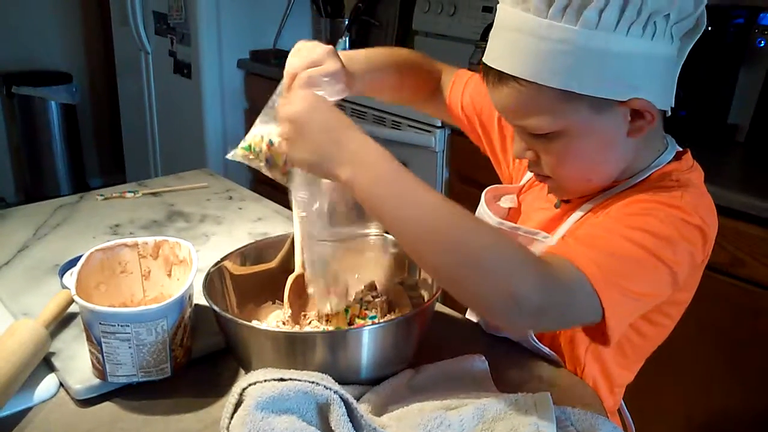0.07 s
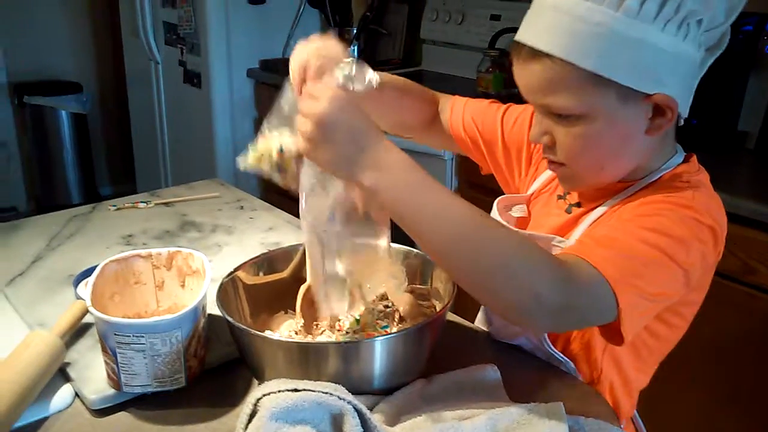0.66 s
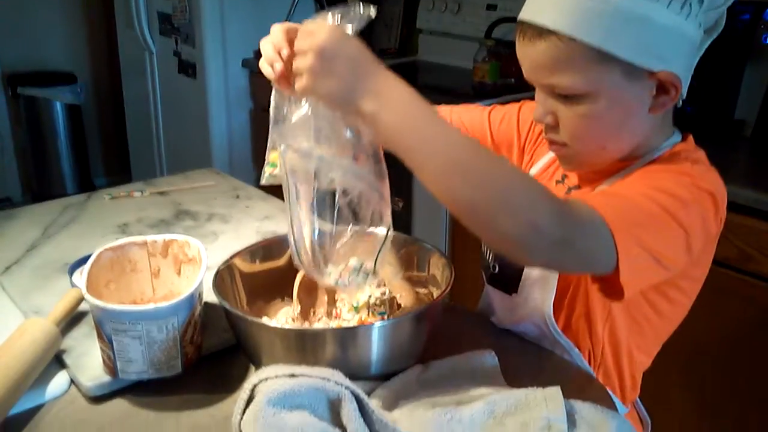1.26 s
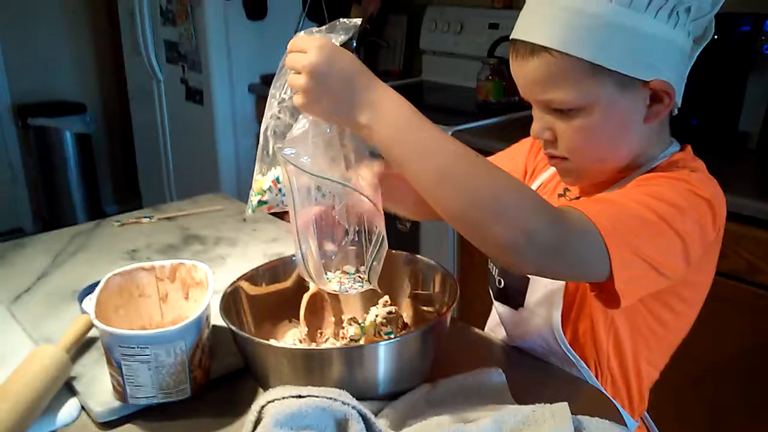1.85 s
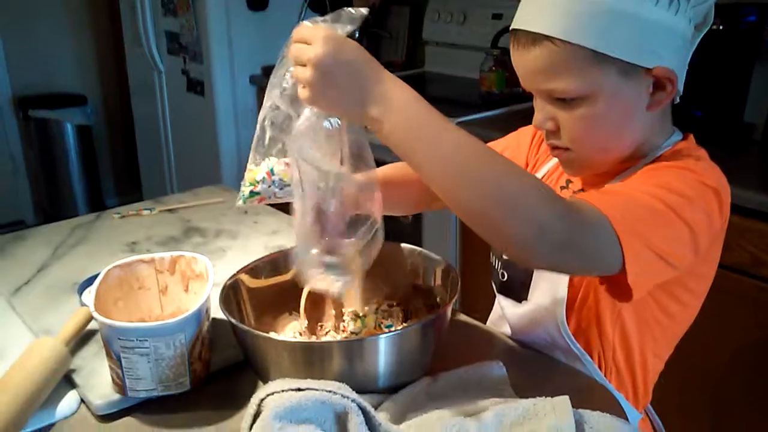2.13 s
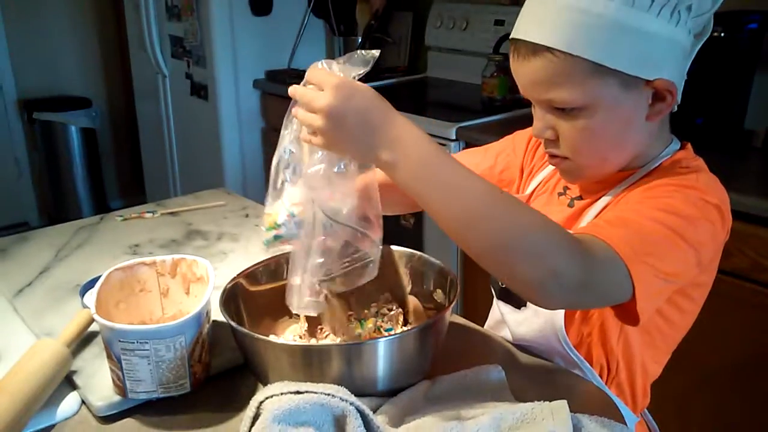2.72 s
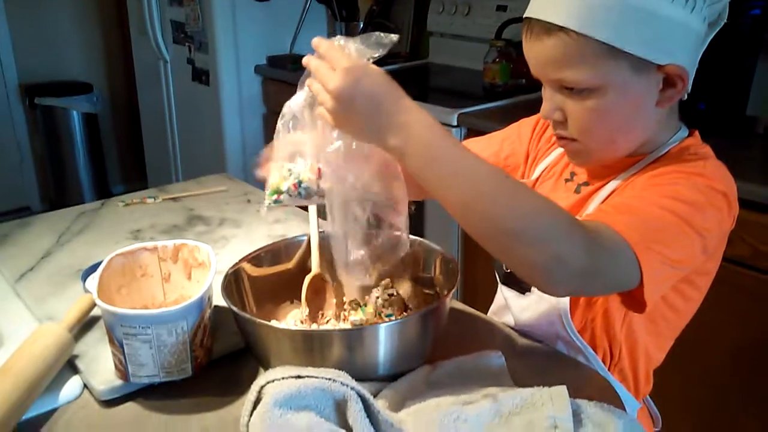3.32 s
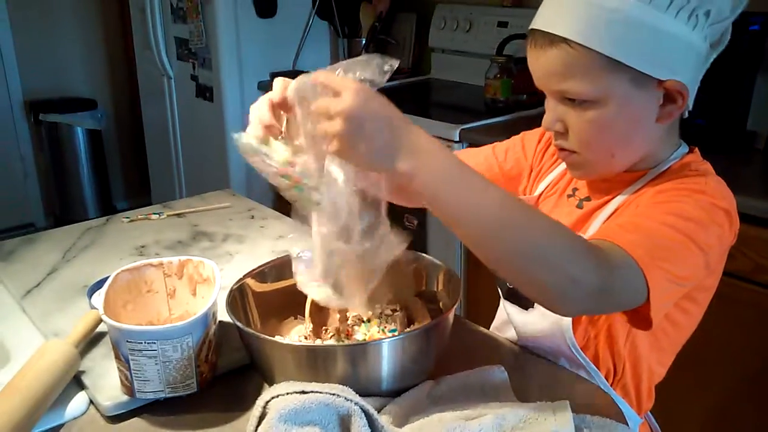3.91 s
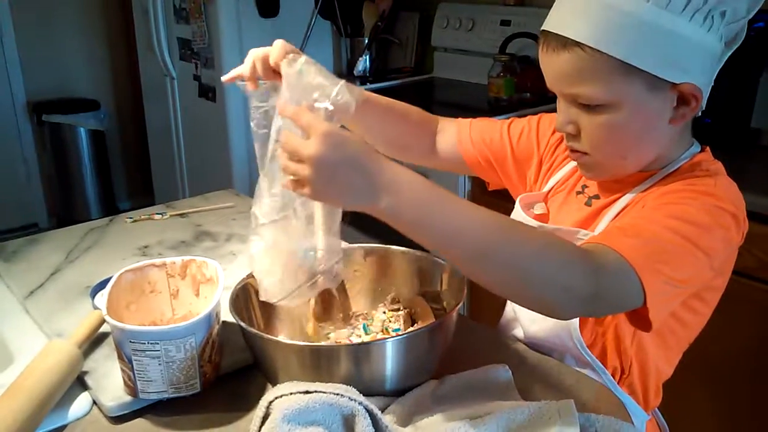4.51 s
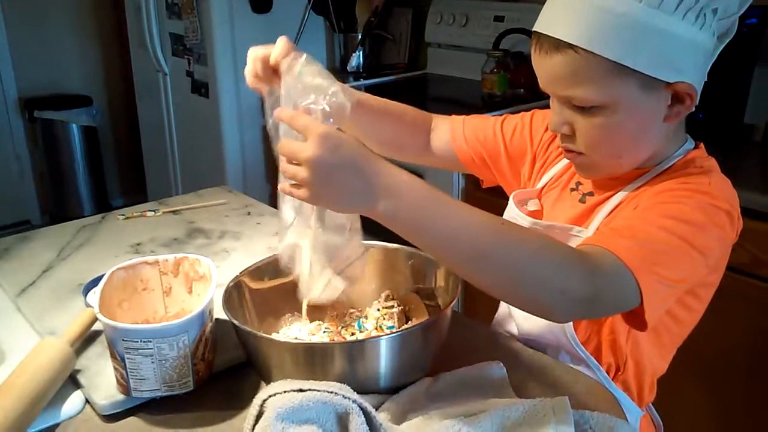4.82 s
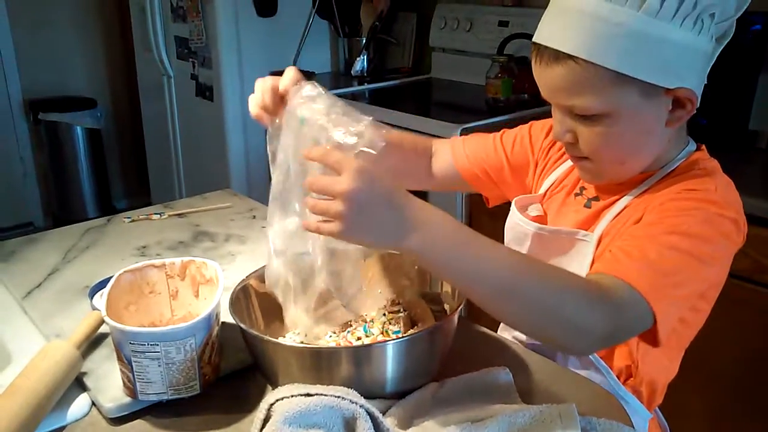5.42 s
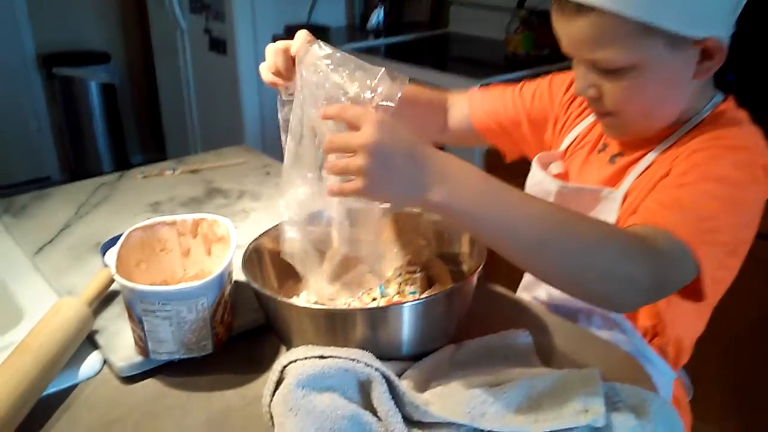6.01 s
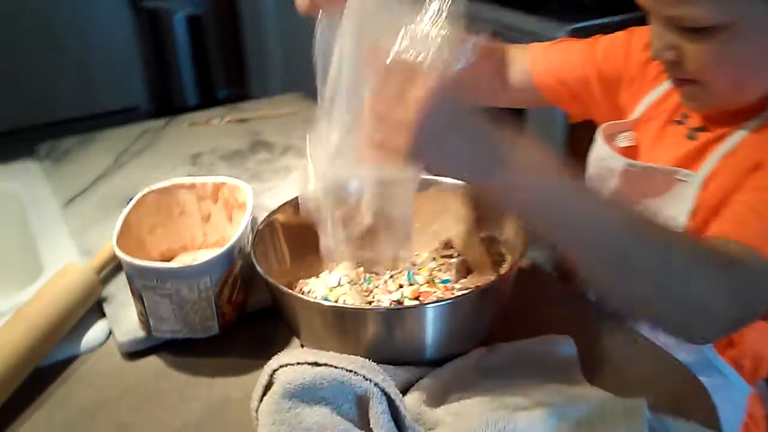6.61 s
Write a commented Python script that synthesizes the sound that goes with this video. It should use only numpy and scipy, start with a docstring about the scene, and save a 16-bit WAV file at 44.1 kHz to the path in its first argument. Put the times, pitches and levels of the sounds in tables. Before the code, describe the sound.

Plastic rustles in uneven bursts while a few candy pieces click into a metal bowl, then the rest falls in a quick rush.

```python
"""Candy poured from a bag

A thin plastic bag of hard candy is shaken out over a steel mixing bowl in a kitchen. The film buckles
in crinkles and snaps; single pieces collide and set the bowl ringing, then the rest pours in a rush.
Behind it are room air, an appliance's hum and whine, and a far motor that speeds up and slows;
a noise suppressor turns these down whenever bag and candy are quiet."""
import sys
import numpy as np
from scipy import signal
from scipy.fft import rfft, irfft
from scipy.io import wavfile
from scipy.ndimage import uniform_filter1d

SR = 44100
rng = np.random.default_rng(int(sys.argv[2]) if len(sys.argv) > 2 else 0)


def master(y):
    """Save y as 16-bit WAV."""
    cut = np.clip(np.atleast_2d(y).T, -1, 1)
    pcm = np.round(cut * 32767)  # scale
    wavfile.write(sys.argv[1], SR, pcm.astype(np.int16))


N = 293573
TIME = np.arange(N) / SR

# spectrum of the crinkling film: (frequency [Hz], gain [dB])
FILM_SPECTRUM = [(350, -17.5), (600, -24.5), (996, -15), (1220, -22), (1380, -18.5), (1650, -12),
                 (1890, -20.5), (2230, -15), (2460, -5), (2740, -4), (3700, 0), (8420, -11), (10800, -3.5),
                 (12500, -16.5), (15800, -12)]
# resonances of the half-filled bag and bowl: (frequency [Hz], width [Hz], gain [dB])
CAVITY_MODES = [(1220, 130, 13), (1750, 210, 3.5), (2167, 310, 10), (2520, 296, -10.5), (2815, 510, 5),
                (10700, 880, -3)]
# spectrum of a hard tick: (frequency [Hz], gain [dB])
TICK_SPECTRUM = [(1000, -25.5), (2800, -31.5), (4400, -3), (7000, 2.5), (8500, -4), (10500, -1),
                 (12000, -15), (15500, -16)]
# candy striking candy: (time [s], relative level [dB], ring frequency [Hz], tick [dB re ring],
# crack [dB re ring], reverberation [dB])
COLLISIONS = [(1.1452, -33, 6730, -14, -28, -4), (1.159, -16, 6800, -8.5, -31, -2.5),
              (2.2516, -23.5, 6860, 3, -9, 4.5), (2.3175, -17.5, 6660, 1.5, -3, -2.5),
              (2.55, -32.5, 6160, 1, -12, -0.5), (2.6024, -29.5, 6960, -11, -2, -3.5),
              (2.7193, -34, 6850, 3, 1, -0.5), (4.1625, -12.5, 6500, 11, 3, -13),
              (4.425, -11, 6900, -8, -18, 7), (4.4668, 2, 6700, -7, -23, -5),
              (4.5282, -1.5, 6700, -4, -27, -4.5), (4.5412, -12, 6340, -6, -25, -10),
              (4.572, -4, 7320, -3.5, -24, -9), (4.6056, -1.5, 6900, -5.5, -18, -6.5),
              (4.609, -17, 4550, -6, -21, -3.5), (4.6277, -20, 6400, 0, -18, 12),
              (4.8726, -29.5, 6860, -9, -8, 2)]


def bag_crinkle(rub_db=-10, rub_growth=0.59, gentle_swell_db=-50, low_edge_hz=2300, high_edge_hz=7000):
    """Buckling and friction: separate creases merge into a rub as the rustle grows louder."""
    level, crisp, flap = rustle_swells()
    fine = creases(per_s=1600, spread_db=4.5, cycles=8.6, lowest_hz=1087, highest_hz=13900)
    folds = .5 * creases(per_s=140, spread_db=2, cycles=30, lowest_hz=2100, highest_hz=6200)
    ticks = from_db(-5) * unit_rms(impulses(per_s=250, spread_db=5))
    crackle = stick_slip() * unit_rms(fine + folds + ticks)
    rub = from_db(rub_db) * (level / from_db(gentle_swell_db)) ** rub_growth
    excitation = (crackle + rub * rng.standard_normal(N)) / np.sqrt(1 + rub ** 2)
    film = colour(excitation, FILM_SPECTRUM, CAVITY_MODES)
    # slack film flaps low and puffs air; tight film is crisp
    slack = from_db(-3) * unit_rms(band(film, 290, low_edge_hz, order=4))
    body = from_db(-1) * unit_rms(band(film, low_edge_hz, high_edge_hz, order=4))
    tight = unit_rms(band(film, high_edge_hz, 23000, order=4))
    puff = from_db(-30) * unit_rms(band(rng.standard_normal(N), 210, 770))
    return flap * slack + level * (body + puff) + crisp * tight


def rustle_swells(held_db=-87.5, swing_db=18.5):
    """Incoherent swells add in power; returns the gains of crinkle, crisp treble and low flapping."""
    # swells of rustle: tugs of the bag, and the brief hiss after falling candy: (time [s],
    # relative level [dB], build-up [s], relaxation [s], treble offset [dB], flapping offset [dB])
    swells = [(0.1, -48, 0.11, 0.34, 2.5, -4), (0.281, -32.5, 0.15, 0.085, -8, -11.5),
              (0.41, -44, 0.074, 0.082, 2, -10.5), (0.73, -57, 0.31, 0.067, 8, -2.5),
              (0.869, -49.5, 0.36, 0.11, -6.5, -9), (1.18, -54.5, 0.055, 0.1, 0, -4.5),
              (1.33, -51.5, 0.12, 0.027, -3.5, -18), (2.061, -62.5, 0.13, 0.05, -8, -12),
              (2.29, -55.5, 0.053, 0.19, 5, -33), (3.101, -54.5, 0.071, 0.095, -5, -11),
              (3.341, -53, .09, 0.045, -2.5, -8), (3.46, -49.5, 0.068, 0.17, -3.5, -7),
              (3.66, -46.5, 0.17, 0.89, -4.5, -8.5), (3.906, -29.5, 0.16, 0.2, -5, -10),
              (4.26, -29, 0.27, 0.13, -3, -5), (4.348, -28.5, 0.029, 0.042, -22, -8.5),
              (4.47, -35.5, 0.27, .15, 8, -5), (4.931, -60.5, 0.24, 0.3, 8, -5),
              (5.09, -42.5, 0.11, 0.14, -8, -12.5), (5.27, -59.5, 0.51, 0.34, -1, 0.5),
              (5.47, -42.5, 0.37, 0.26, -6, -11.5), (5.62, -51, .05, 0.27, 1.5, -2.5),
              (5.8, -54, 0.084, 0.44, -6, -5.5), (6.06, -54, 0.28, 0.12, -29, -11),
              (6.19, -41, 0.17, 0.18, -6.5, -6.5), (6.51, -53, 0.04, 0.04, -4.5, -10),
              (6.608, -55, .04, 0.22, -9.5, -7)]
    power = np.full((3, N), from_db(held_db) ** 2)
    for s, db, build_s, relax_s, crisp_db, flap_db in swells:
        from_peak = np.maximum((s - TIME) / build_s, (TIME - s) / relax_s)
        envelope = from_db(db - swing_db * np.minimum(from_peak, 10))
        power += (from_db([[0], [crisp_db], [flap_db]]) * envelope) ** 2
    return np.sqrt(power)


def creases(per_s, spread_db, cycles, lowest_hz, highest_hz, clump_db=4, clumps_per_s=30, count=16):
    """Impulse excitation: creases come in clumps, each ringing for some cycles at its own pitch."""
    out = np.zeros(N)
    for hz in np.geomspace(lowest_hz, highest_hz, count):
        clicks = impulses(per_s / count, spread_db) * from_db(clump_db * drift(clumps_per_s))
        out += np.sqrt(hz) * unit_rms(damped_mode(clicks, hz, t60=cycles / hz))
    return unit_rms(out)


def stick_slip(per_s=14, jump_db=7, fade_s=0.014):
    """Stick-slip: the film gives way in fits, so its gain jumps at once and then relaxes."""
    starts = rng.random(N) < per_s / SR
    slip = signal.lfilter([1], [1, -np.exp(-1 / (fade_s * SR))], starts + 1e-18)
    return unit_rms(from_db(jump_db * np.minimum(slip, 1)))


def bag_snaps(gain_db=-11, buckle_t60=.022, crack_t60=0.009, crack_db=2):
    """Snap-through buckling: a large fold gives a knock, a brief pitch set by its size, and a crack."""
    # sharp buckles of the film: (time [s], relative level [dB], centre [Hz], crack offset [dB])
    buckles = [(0.1106, -29, 6500, -7), (0.272, -21, 3500, -23), (0.355, -36.5, 4170, 7.5),
               (0.393, -34, 2880, 2.5), (0.6845, -35, 4590, -7), (0.7313, -36.5, 4600, 4),
               (1.0294, -43, 4950, -4.5), (1.1003, -48, 4180, 4), (1.226, -31.5, 7100, -5),
               (1.4635, -49.5, 3440, -2), (1.66, -48.5, 3060, 1.5), (1.908, -43, 5960, -4),
               (1.9717, -48, 3830, -2), (2.022, -42.5, 5500, -1.5), (2.201, -49.5, 3990, -1),
               (2.2463, -34.5, 4800, -3), (2.522, -45, 6900, -3), (2.688, -44, 6870, -3),
               (2.905, -48.5, 3006, -10), (2.9558, -54.5, 3060, 6), (3.098, -40.5, 2710, -5),
               (3.2814, -46, 2933, -5), (3.4458, -31.5, 5600, -27), (3.7537, -26.5, 4040, -14),
               (3.7716, -24, 3900, -7), (3.8459, -14.5, 4550, -17), (3.914, -13.5, 4820, -2),
               (4.347, -3, 6100, -29), (4.9458, -31, 4930, -11), (5.075, -29.5, 3320, -14),
               (5.132, -28.5, 3100, -19), (5.2106, -36.5, 5180, -0.5), (5.6142, -28, 4400, -24),
               (5.7904, -37, 3094, 1), (5.98, -31, 5000, -20), (6.059, -35, 2950, -23),
               (6.1, -27, 3600, -7), (6.131, -13, 4940, -25), (6.603, -37.5, 3480, -6)]
    out = np.zeros(N)
    for s, db, hz, bright_db in buckles:
        knock = unit_rms(band(contacts(buckle_t60, wet_db=-4), hz / 1.46, hz * 1.46, order=1))
        ring = unit_rms(band(contacts(buckle_t60, wet_db=-14), hz / 1.15, hz * 1.15))
        crack = band(contacts(crack_t60, wet_db=-4), 7500, 21000)
        add(out, s, db + gain_db, colour(knock + from_db(-3) * ring, FILM_SPECTRUM, CAVITY_MODES))
        add(out, s, db + gain_db + bright_db + crack_db, colour(crack, TICK_SPECTRUM))
    return out


def bag_pops(gain_db=-9, edge_ratio=1.176, pop_t60=.022, wet_db=-1):
    """Cavity resonance: the air in the bag gives a flap a short, hollow ring and a low thud."""
    # slack film flapping taut: (time [s], relative level [dB], ring [Hz], thud [dB re ring])
    flaps = [(0.2723, -44, 1280, -14), (2.9043, -63, 1311, -15), (4.2378, -24, 1610, -24),
             (4.346, -37, 650, -3), (6.1284, -23, 2010, -18.5)]
    out = np.zeros(N)
    for s, db, hz, thud_db in flaps:
        ring = band(contacts(pop_t60, wet_db), hz / edge_ratio, hz * edge_ratio, order=3)
        thud = band(contacts(pop_t60, wet_db), 200, 740)
        add(out, s, db + gain_db, ring)
        add(out, s, db + gain_db + thud_db, thud)
    return out


def candy_clicks(gain_db=-10, half_width_hz=325, contact_t60=.013, tick_t60=.007):
    """Hard impact: brief contacts between shells excite a high ring, a broad tick and a brittle crack."""
    out = np.zeros(N)
    for s, db, hz, tick_db, crack_db, wet_db in COLLISIONS:
        shell = unit_rms(band(contacts(contact_t60, wet_db), hz - half_width_hz, hz + half_width_hz))
        tick = unit_rms(colour(contacts(tick_t60, wet_db - 1), TICK_SPECTRUM))
        crack = unit_rms(band(contacts(tick_t60, wet_db=-7), 8600, 18000))
        add(out, s, db + gain_db, shell + from_db(tick_db) * tick + from_db(crack_db) * crack)
    return out


def candy_pour(start_s=4.08, full_s=4.5, empty_s=4.59, hits_per_s=1500, shell_t60=0.0015, count=8):
    """Superposed impacts: tumbling pieces of slightly different size ring at neighbouring pitches."""
    swell_db = np.interp(TIME, [start_s, full_s], [-45, -29])  # from a trickle to a rush
    emptying_db = 895 * np.clip(TIME - empty_s, 0, .5)
    envelope = (TIME > start_s) * from_db(swell_db - emptying_db)
    hits = [impulses(hits_per_s / count, spread_db=5) for _ in range(count)]
    shell_hz = np.linspace(6250, 7200, count)
    shells = sum(damped_mode(train, hz, shell_t60) for train, hz in zip(hits, shell_hz))
    ticks = colour(sum(hits), TICK_SPECTRUM)
    return envelope * (unit_rms(band(shells, 2470, 8100)) + from_db(-7) * unit_rms(ticks))


def bowl_ring(gain_db=-40, scatter_db=0.97):
    """Free vibration: every candy click leaves the bowl's modes ringing faintly."""
    # modes of the steel bowl: (frequency [Hz], relative level [dB], t60 [s])
    modes = [(5930, -3, 0.092), (5950, -0.5, 0.28), (6170, -23, 0.14), (7100, -21.5, 0.27),
             (7200, -23.5, 0.13), (7440, -5.5, 0.32), (7200, -4, 0.19), (6900, -9.5, 0.7),
             (7740, -16, 0.23), (7440, -10.5, 0.44)]
    s, db = np.transpose(COLLISIONS)[:2]
    out = np.zeros(N)
    for hz, mode_db, t60 in modes:
        blows = np.zeros(N)
        blows[(s * SR).astype(int)] = from_db(db + mode_db + gain_db + rng.normal(0, scatter_db, len(s)))
        out += damped_mode(blows, hz, t60)
    return out


def contacts(t60, wet_db, rise_s=0.0012, bounce_db=-4, bounce_t60=0.062):
    """Exponential decay in three stages: tiny contacts, bounces off bowl and counter, then the room."""
    tail = kitchen_response()
    t = TIME[:len(tail)]
    attack = np.minimum(t / rise_s + 0.093, 1)
    flurry = rng.choice([-1, 1], len(t)) * attack * from_db(-60 * t / t60)
    bounces = rng.standard_normal(len(t)) * from_db(-60 * t / bounce_t60)
    early = flurry / np.linalg.norm(flurry) + from_db(bounce_db) * bounces / np.linalg.norm(bounces)
    return early + from_db(wet_db) * tail


def kitchen_response():
    """Diffuse reverberation: a unit-energy tail for one spot in the room, dying band by band."""
    # reverberation time of the kitchen: (frequency [Hz], t60 [s])
    decay_times = [(300, 0.93), (2000, 0.35), (4000, 0.4), (7000, 0.41), (11000, 0.31), (16000, 0.34)]
    t = TIME[:SR * 2 // 3]
    edges = np.geomspace(400, 19000, 8)
    white = rng.standard_normal(len(t))
    tail = np.zeros(len(t))
    for k, (low, high) in enumerate(zip(edges, edges[1:])):
        t60 = at_hz(decay_times, np.sqrt(low * high))
        tail += (-1) ** k * band(white, low, high) * from_db(-60 * t / t60)
    return tail / np.linalg.norm(tail)


def moving_in_room(x, spots=5, moves_per_s=60):
    """Reflections depend on position: the moving bag meets different echoes from moment to moment."""
    spot = (TIME * moves_per_s).astype(int) % spots
    return sum(signal.fftconvolve(x * (spot == k), kitchen_response())[:N] for k in range(spots))


def room_air(level_db=-66):
    """Stationary noise: the room's air is a steady hiss, strongest in the bass."""
    # spectrum of the room air: (frequency [Hz], gain [dB])
    spectrum = [(20, -12.5), (42, 5.5), (70, 8), (130, 12), (190, -1), (280, -0.5), (450, -4.5), (800, -5),
                (1500, -7.5), (4000, -14), (9000, -6), (15000, -15.5)]
    air = colour(rng.standard_normal(N), spectrum)
    return from_db(level_db) * air / np.std(band(air, 260, 1600))


def appliance(hum_hz=120.5, hum_db=-62, whine_hz=791.5, whine_db=-67.5):
    """Random modulation: a hum and a thin whine waver in level, the whine also in phase."""
    hum = from_db(hum_db + 2 * drift(7.9)) * np.sin(2 * np.pi * hum_hz * TIME)
    whine = from_db(whine_db + 2 * drift(36)) * np.sin(2 * np.pi * whine_hz * TIME + 0.52 * drift(10))
    return hum + whine


def far_motor(waver_db=5.5, rumble_db=-3):
    """Forced resonance: a motor rumbles through the walls; its tones boom as they pass room modes."""
    # the motor speeding up, then running down: (time [s], pitch [Hz], level [dB])
    run = [(0, 44.97, -67), (2.15, 75.4, -64), (3.45, 96, -63), (4.83, 122.6, -59), (5.35, 135, -68.5),
           (5.55, 123, -62), (5.85, 104, -72), (6.66, 93.3, -101)]
    # the motor's tones: (multiple of the pitch [ratio], relative level [dB])
    tones = [(0.63, -3), (1, -1), (1.399, -15), (2, -10.5)]
    # low resonances of the kitchen: (frequency [Hz], width [Hz], gain [dB])
    room_modes = [(48.3, 7.8, 8.5), (67.6, 12, 7.5), (77.7, 8.4, 10.5), (96, 6.6, 19), (108.7, 3.5, 13.5),
                  (123, 6, 19)]
    s, pitches, levels = np.transpose(run)
    pitch, level = np.interp(TIME, s, pitches), np.interp(TIME, s, levels)
    rumble = unit_rms(band(rng.standard_normal(N), 150, 410))
    out = from_db(level + rumble_db) * (pitch / pitch.max()) ** 3 * rumble
    for multiple, db in tones:
        hz = multiple * pitch
        gain = from_db(level + db + resonance_db(room_modes, hz) + waver_db * drift(16))
        out += gain * np.sin(2 * np.pi * np.cumsum(hz) / SR)
    return band(out, 52, 1000)


def suppressor(foreground, open_db=-43, slope=.58, depth_db=-20, lag_s=0.072):
    """Downward expansion: the background's gain opens with the foreground and sinks in the pauses."""
    power = uniform_filter1d(band(foreground, 1500, 16000) ** 2, size=441)
    heard_db = 10 * np.log10(np.maximum(power, 1e-12))
    cut_db = np.clip(slope * (heard_db - open_db), depth_db, 0)
    pole = np.exp(-1 / (lag_s * SR))
    smooth_db, _ = signal.lfilter([1 - pole], [1, -pole], cut_db, zi=[cut_db[0]])
    return from_db(smooth_db)


def from_db(db):
    """Decibels to amplitude ratio."""
    return 10 ** (np.asarray(db) / 20)


def unit_rms(x):
    """Normalisation to unit power."""
    return x / np.sqrt(np.mean(x ** 2) + 1e-20)


def at_hz(points, hz):
    """Interpolation on a log-frequency axis."""
    f, value = np.transpose(points)
    return np.interp(np.log(np.maximum(hz, 1)), np.log(f), value)


def resonance_db(modes, hz):
    """Lorentzian peaks and dips, summed in decibels."""
    return sum(db / (1 + (2 * (hz - centre) / width) ** 2) for centre, width, db in modes)


def colour(x, spectrum, modes=(), size=4096):
    """Minimum-phase filtering by a spectrum and its resonances."""
    hz = np.arange(size // 2 + 1) * SR / size
    db = at_hz(spectrum, hz) + resonance_db(modes, hz)
    cepstrum = irfft(np.log(from_db(db)))
    cepstrum[1:size // 2] *= 2  # folding onto positive time makes the filter causal
    cepstrum[size // 2 + 1:] = 0
    return signal.fftconvolve(x, irfft(np.exp(rfft(cepstrum))))[:len(x)]


def band(x, low_hz, high_hz, order=2):
    """Maximally flat band-pass filtering."""
    edges = [low_hz, min(high_hz, .45 * SR)]
    return signal.sosfilt(signal.butter(order, edges, "band", fs=SR, output="sos"), x + 1e-18)


def drift(per_s):
    """Interpolated Gaussian noise with a spread of about one."""
    knots = rng.standard_normal(2000)
    return np.interp(TIME * per_s, np.arange(len(knots)), knots)


def damped_mode(clicks, hz, t60):
    """A damped harmonic oscillator, falling 60 dB in t60 seconds."""
    r, w = from_db(-60 / (t60 * SR)), 2 * np.pi * hz / SR
    return signal.lfilter([np.sin(w), 0, -np.sin(w)], [1, -2 * r * np.cos(w), r * r], clicks + 1e-18)


def impulses(per_s, spread_db):
    """A Poisson process of clicks, many small and a few large."""
    sizes = from_db(spread_db * np.minimum(rng.exponential(1, N), 4))
    return sizes * rng.choice([-1, 1], N) * (rng.random(N) < per_s / SR)


def add(out, s, db, sound):
    """Superposition: mix in a sound at time s, with its loudest 5 ms at level db."""
    at = int(s * SR)
    loudest = np.sqrt(uniform_filter1d(sound ** 2, size=220).max())
    out[at:at + len(sound)] += (from_db(db) * sound / loudest)[:N - at]


def scene(crinkle_db=-1.5, crinkle_wet_db=-3, pour_db=-3, pour_wet_db=-1):
    """Direct and reverberant sound of bag and candy add to a background that sinks in their pauses."""
    crinkle = from_db(crinkle_db) * bag_crinkle()
    pour = from_db(pour_db) * candy_pour()
    room = moving_in_room(from_db(crinkle_wet_db) * crinkle + from_db(pour_wet_db) * pour)
    foreground = crinkle + pour + room + bag_snaps() + bag_pops() + candy_clicks() + bowl_ring()
    background = room_air() + appliance() + far_motor()
    return (foreground + suppressor(foreground) * background)[None]


def record(dry, cutoff_hz=15950):
    """Soft saturation rounds the highest peaks; a steep low-pass cuts the top."""
    low_pass = signal.ellip(12, .1, 80, cutoff_hz, fs=SR, output="sos")
    return signal.sosfilt(low_pass, np.tanh(dry))


dry = scene()
out = record(dry)
master(out)
```